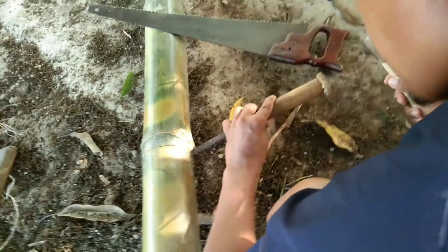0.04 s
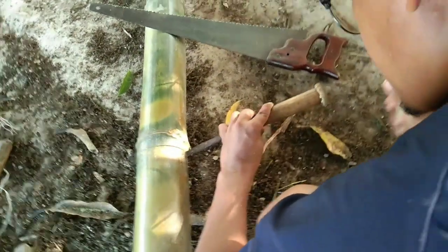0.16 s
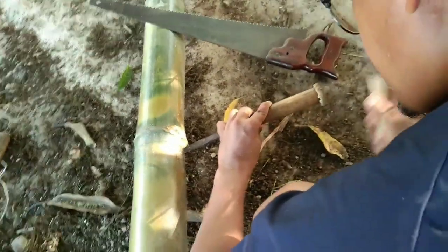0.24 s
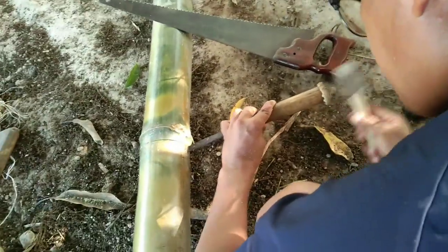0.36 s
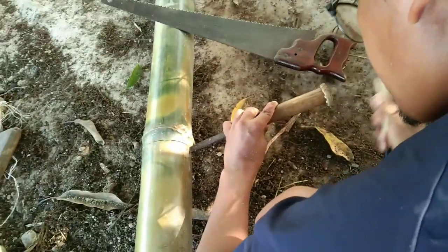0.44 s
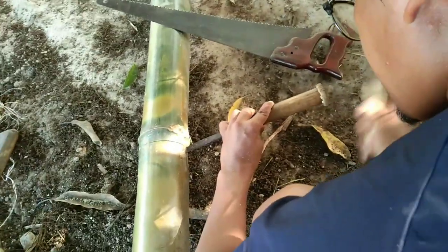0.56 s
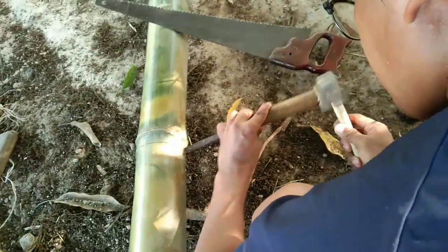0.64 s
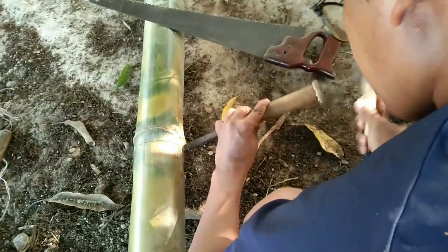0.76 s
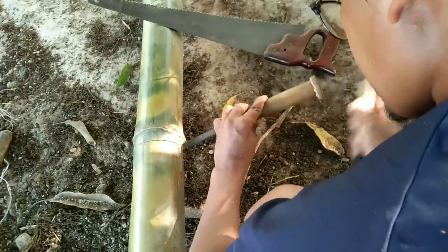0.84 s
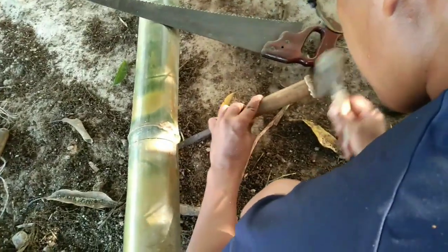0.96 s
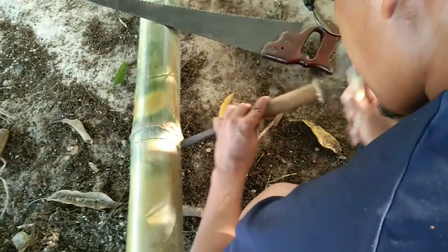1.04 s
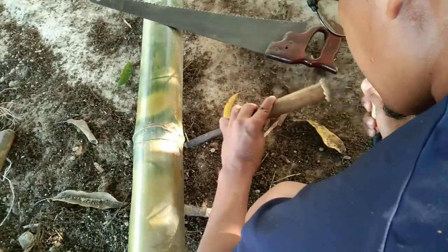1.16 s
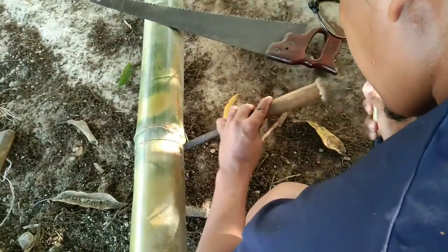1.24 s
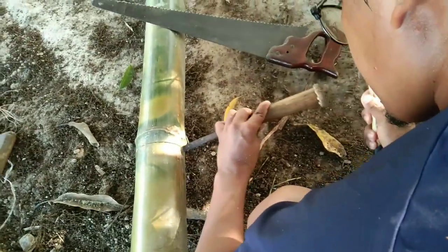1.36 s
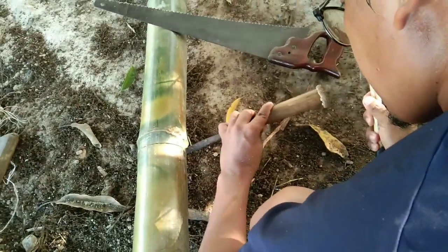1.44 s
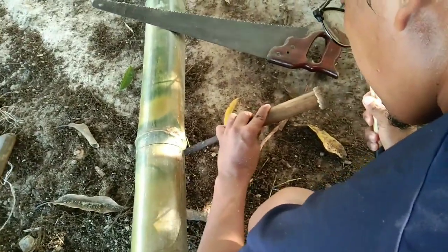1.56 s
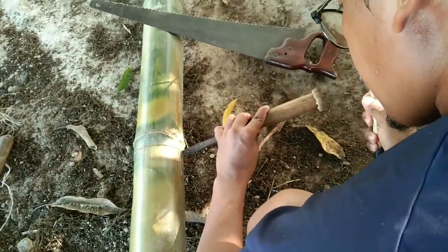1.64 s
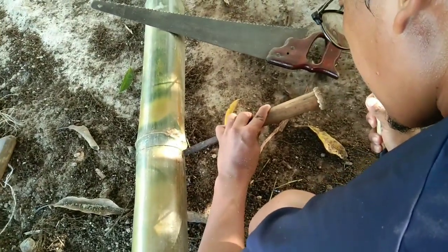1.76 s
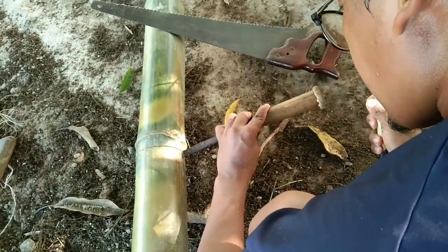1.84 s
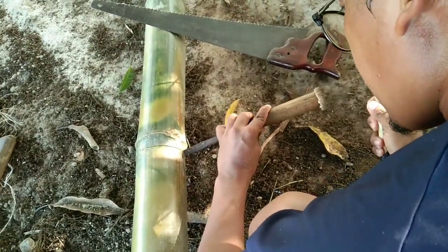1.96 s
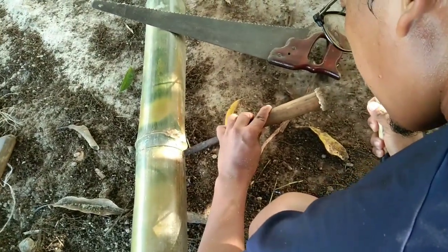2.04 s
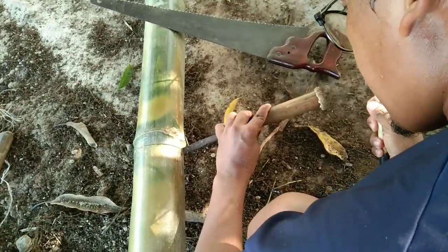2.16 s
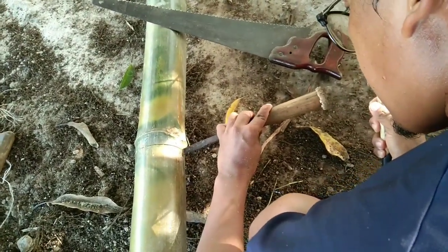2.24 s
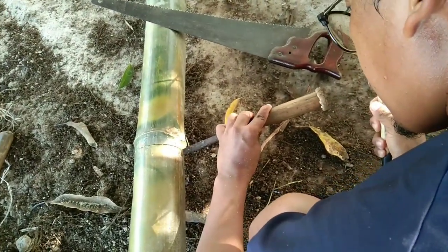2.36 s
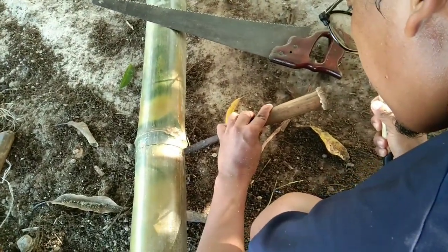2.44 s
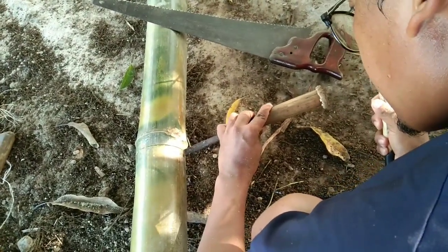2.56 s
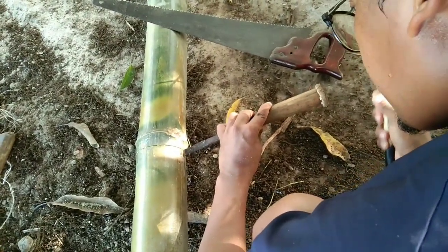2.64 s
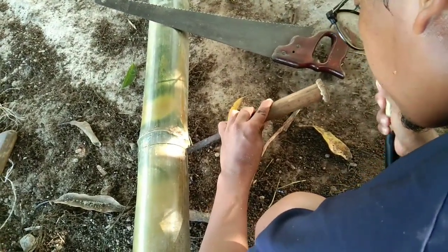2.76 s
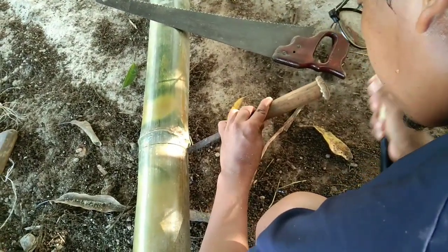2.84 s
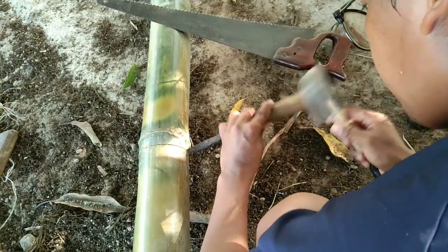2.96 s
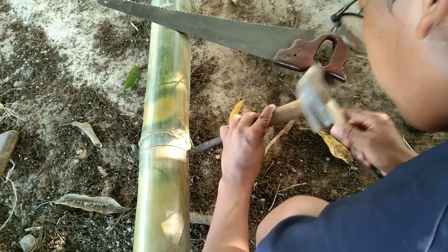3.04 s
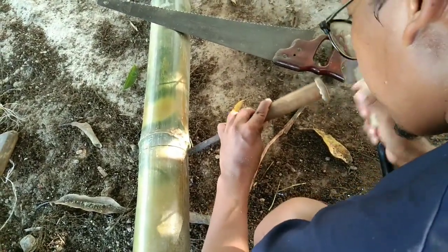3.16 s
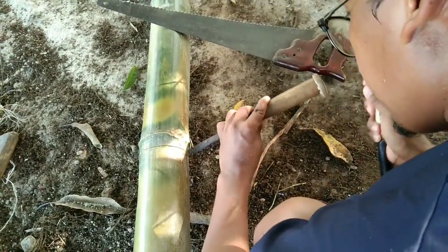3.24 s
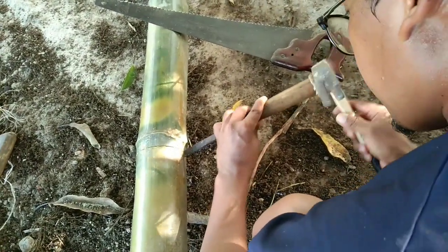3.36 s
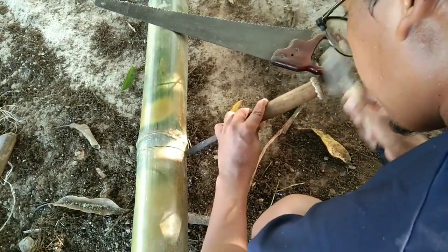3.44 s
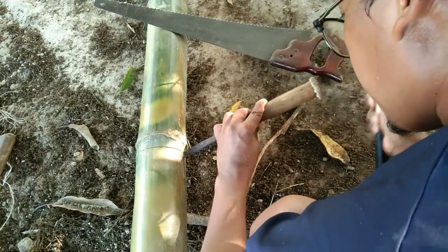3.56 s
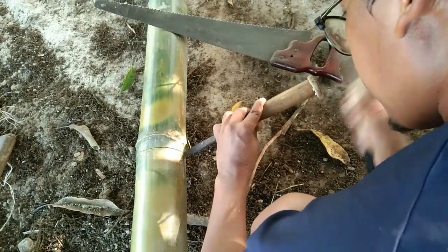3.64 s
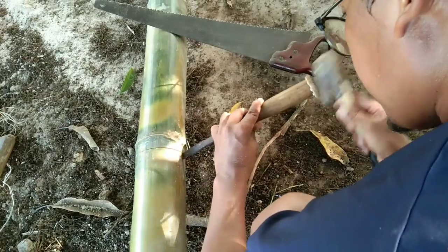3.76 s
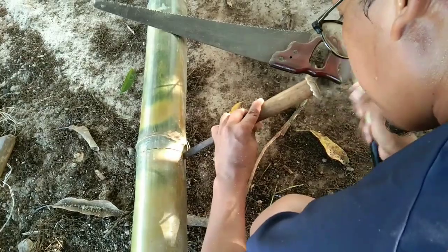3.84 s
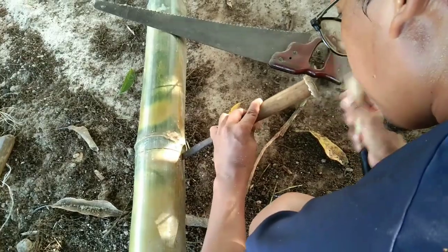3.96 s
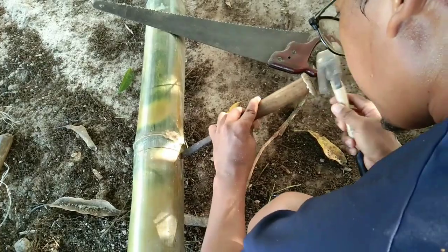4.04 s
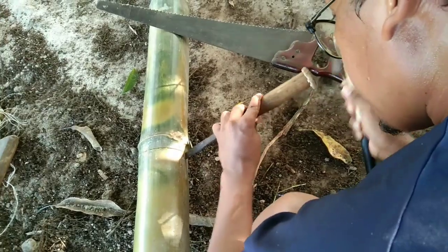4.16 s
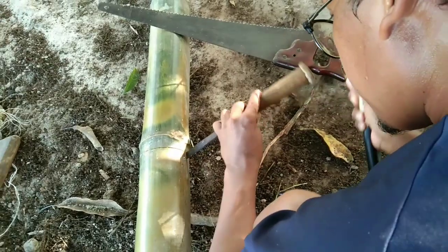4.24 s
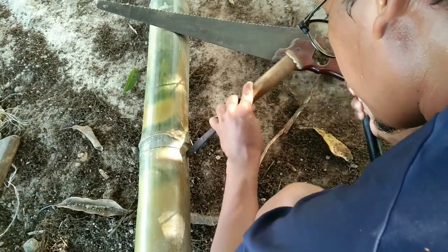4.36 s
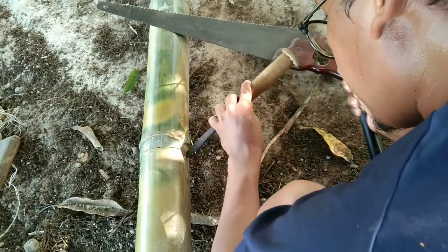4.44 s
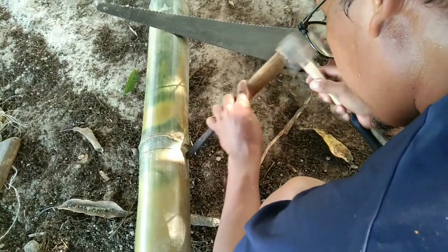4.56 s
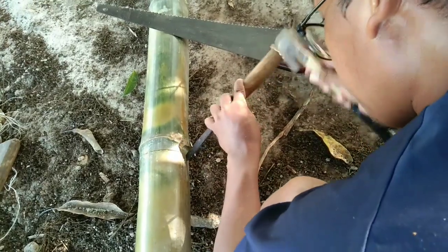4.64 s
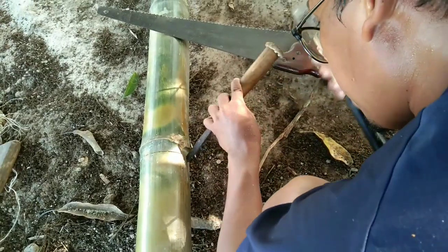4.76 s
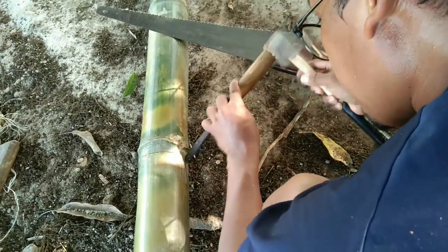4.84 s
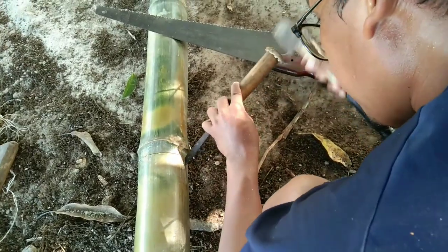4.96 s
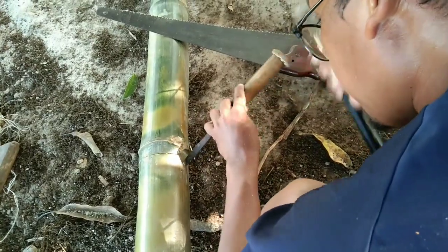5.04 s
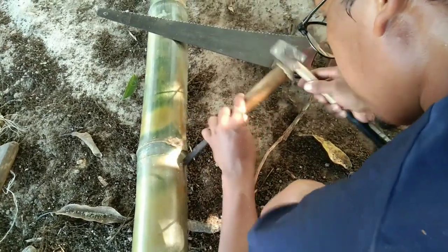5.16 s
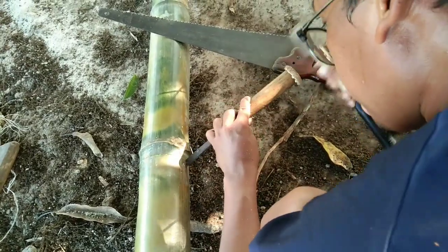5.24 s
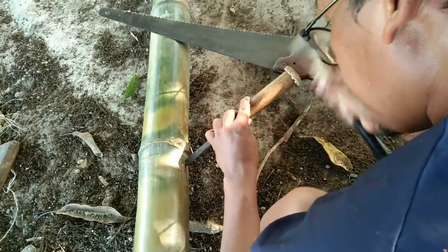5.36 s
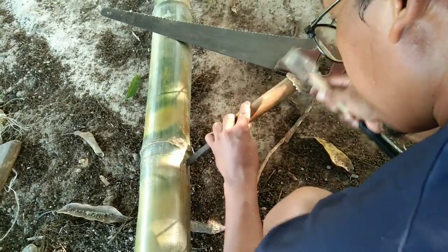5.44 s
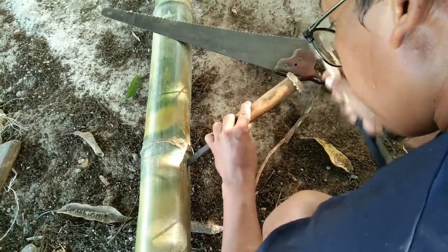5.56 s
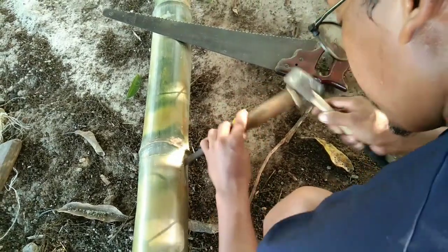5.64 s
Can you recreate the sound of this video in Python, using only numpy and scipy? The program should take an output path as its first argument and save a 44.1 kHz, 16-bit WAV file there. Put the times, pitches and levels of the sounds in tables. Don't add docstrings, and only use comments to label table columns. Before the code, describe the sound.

Outdoors on soil, very close to the microphone, a hammer hits a wood-handled chisel cutting green bamboo. Three sharp, hollow knocks come quickly, each with a steely edge and short rattle. Small ticks trail off into a lull of leaf rustle, cloth scuffs, a faint coo and rising bird slurs. Two more blows follow, a pause with falling chips, then five rapid cracks to the end, the loudest slightly overloaded.

```python
import sys
import numpy as np
from scipy import signal
from scipy.fft import rfft, irfft
from scipy.io import wavfile
from scipy.ndimage import uniform_filter1d

SR = 44100
rng = np.random.default_rng(int(sys.argv[2]) if len(sys.argv) > 2 else 0)


def field_ratio(decibels):
    return 10 ** (np.asarray(decibels, dtype=float) / 20)


def inscribe(sig):
    pcm = np.round(np.clip(np.atleast_2d(sig).T, -1, 1) * 32767)
    wavfile.write(sys.argv[1], SR, pcm.astype(np.int16))


N = 251370

# t/s, wood peak level/dB, handle and blade re wood level/dB, wood mode under the edge f/Hz
BLOWS = [
    (0.3444, -6, -8.5, 7, 766),
    (0.651, -3.5, 0, 4.5, 1459),
    (0.9335, -7.5, -4, -1.5, 854),
    (3.3934, -6.5, -0.5, 5, 640),
    (3.7107, 0, -8.5, -3, 1350),
    (4.5999, -9, -13, -11, 599),
    (4.867, -3.5, -10, 8, 863),
    (5.127, -4, -8, 8.5, 1077),
    (5.402, -3.5, -21.5, 4.5, 555),
    (5.639, -1, -8.5, 0.5, 1424),
]
# f/Hz, level/dB, t60/s
THUDS = [
    (204, -18, 0.0428),
    (190, -25, 0.0267),
    (199.5, -16, 0.032),
    (148.4, -20, 0.0175),
    (158.4, -24, 0.054),
    (165, -17, 0.041),
    (173.4, -18.5, 0.0463),
    (325, -12, 0.057),
    (289.5, -11, 0.082),
    (306, -17.5, 0.142),
]
# emphasis level/dB, handle f/Hz, blade f/Hz, split fibre level/dB
SPOTS = [
    (14.34, 3160, 5525, -44),
    (18.3, 3184, 7340, -51),
    (6.03, 2830, 4200, -46.5),
    (2, 3420, 5444, -27),
    (23.9, 3240, 6500, -21.5),
    (5, 2664, 6800, -53.5),
    (6, 2983, 6980, -41.5),
    (7.9, 2412, 6800, -41),
    (14.3, 2900, 5700, -45.5),
    (10.1, 2433, 4400, -28.5),
]
# level/dB, bass level/dB, handle range level/dB, blade range level/dB, t60/s
TAILS = [
    (-22, 1.5, -8.5, 4.5, 0.252),
    (-24.5, 1.5, 8.5, 9, 0.345),
    (-24.5, 4, 0, 2.5, 0.371),
    (-21.5, -13, 1.5, 4.5, 0.2665),
    (-19.5, -7, -4.5, 0, 0.2765),
    (-23.5, 4.5, -11.5, -10.5, 0.2155),
    (-24, 3, 6.5, 10, 0.244),
    (-24, 5.5, 2.5, 5.5, 0.295),
    (-18.5, 2, -4, -1.5, 0.2465),
    (-17, -17, 0.5, -3, 0.176),
]
# t/s, f/Hz, level/dB, t60/s
WALL_MODES = [(.345, 439, -28.5, 0.018), (.345, 1770, -20, 0.0285), (.652, 2163, -17, .02),
              (.652, 2715, -17.5, 0.015), (.653, 3184, -15, 0.048), (.934, 1450, -16.5, 0.019),
              (.935, 3944, -25.5, 0.0157), (.935, 5680, -11.5, 0.0116), (3.395, 826, -13, 0.0224),
              (3.394, 1691, -12, 0.041), (3.394, 2290, -18.5, 0.026), (3.41, 640, -14, 0.092),
              (3.712, 615, -18.5, 0.028), (3.711, 1050, -13.5, 0.021), (3.711, 2190, -14, 0.0158),
              (4.599, 1315, -29, 0.022), (4.601, 2760, -30.5, 0.02), (4.601, 3660, -41.5, 0.0156),
              (4.868, 699, -12, 0.0228), (4.868, 1522, -14.5, 0.0194), (4.868, 2030, -20, 0.0234),
              (4.869, 3540, -19, 0.0193), (4.88, 519, -28, 0.17), (5.127, 1353, -9, 0.02),
              (5.649, 1480, -21, 0.094), (.652, 1900, -17, .03), (3.394, 728, -17.5, 0.033),
              (3.712, 501, -20.5, 0.026), (3.711, 4735, -14, 0.014), (4.872, 1350, -18, .06),
              (5.129, 2297, -21.5, 0.034), (5.13, 1456, -22, 0.098), (5.135, 505, -26, 0.178),
              (5.13, 1700, -25.5, .07), (5.405, 1296, -22, 0.098), (5.405, 1431, -19, 0.067),
              (5.404, 432.3, -23.5, 0.081), (5.406, 2429, -29, 0.093), (5.405, 6136, -12, 0.037),
              (5.64, 1580, -17, .06), (5.641, 1277, -19, 0.108), (5.643, 2439, -20.5, 0.103),
              (5.64, 4780, -18.5, 0.079), (5.642, 499, -24, 0.185), (5.642, 433.3, -20.5, 0.124),
              (5.648, 759.8, -23.5, 0.148)]
# t/s, f/Hz, level/dB, t60/s
LOOSE_MODES = [(.4755, 894, -21, 0.03), (0.4787, 1754, -24, 0.0216), (.479, 2064, -28, 0.039),
               (0.4807, 2668, -24.5, 0.0226), (.513, 4000, -29, 0.0123), (.81, 898, -29, 0.0315),
               (.834, 805, -28, 0.0495), (.878, 544, -38, 0.056), (.914, 1003, -27.5, 0.052),
               (1.064, 1378, -37.5, 0.053), (1.111, 1385, -35, 0.049), (1.345, 403, -44, 0.077),
               (2.915, 376.4, -46, 0.071), (3.212, 935, -45, 0.039), (5.57, 540, -39, .12),
               (3.362, 696, -42.5, .04), (3.888, 1395, -37.5, 0.064), (3.89, 2550, -41.5, 0.052),
               (3.93, 1350, -39, 0.062), (3.932, 551, -41, 0.039), (3.97, 1142, -46.5, 0.116),
               (4.013, 2600, -42.5, .03), (4.045, 904, -46.5, .06), (4.76, 6200, -28, 0.0216),
               (5.266, 785, -37.5, 0.0214), (5.321, 6910, -20.5, 0.013)]
# t/s, level/dB, f/Hz
HOPS = [(0.386, -22, 754), (0.821, -30.5, 700), (.946, -17, 2200), (.963, -14, 830), (3.433, -17, 801),
        (3.465, -27, 957), (3.741, -27.5, 896), (3.782, -26, 980), (3.862, -27.5, 944), (4.621, -26.5, 991),
        (4.896, -39, 780), (4.928, -40, 1700), (5.66, -23, 740)]
# t/s, wood peak level/dB, handle re wood level/dB, wood f/Hz, rattle re wood level/dB
KNOCKS = [(0.476, -30, -19, 986, -13.5), (0.807, -20.5, -4, 513.3, -9.5), (0.834, -33, -40, 810, -6.5),
          (0.856, -25, -23.5, 520, -17), (0.912, -23, 1, 956, -14), (1.068, -33, -10.5, 431, -7),
          (1.115, -36, 6.5, 730, -2.5), (1.168, -46.5, 12.5, 680, 2), (1.284, -46, -11.5, 515, -1),
          (1.442, -31, -15.5, 573, -19), (2.705, -45.5, 12, 406, -12), (2.93, -51, -12, 774, 2),
          (2.998, -48, -9, 460, -5), (4.664, -28, -12.5, 487, -18), (5.282, -35, -11.5, 519.7, -15.5)]
# t/s, level/dB
RETURNS = [
    (.474, -30.5),
    (3.511, -32),
    (3.838, -31),
    (4.99, -39.5),
    (5.263, -39),
    (5.524, -31.5),
    (5.621, -41),
]
# t/s, peak level/dB, handle re peak level/dB, wood re peak level/dB
TICKS = [(0.2079, -22, -24, -31.5), (0.711, -20.5, 8, -10.5), (0.887, -37, 5.5, -7), (1, -23, 1.5, 3.5),
         (1.008, -20, 0.5, 4), (1.1098, -25, -2, 4), (1.166, -26, -2.5, 5), (1.3513, -32.5, 4, -2),
         (2.7298, -35, 10.5, -2.5), (2.8475, -39.5, 5.5, -12.5), (2.9978, -27, -21, -24),
         (3.209, -40.5, -20.5, -17.5), (3.357, -41, 14.5, 5), (3.573, -31, -32, -30),
         (3.591, -30.5, -24, -19.5), (3.772, -26, -5.5, -12), (3.89, -33.5, 3.5, 6.5),
         (3.93, -31, -1.5, -4), (5.0192, -26.5, -10, -22.5), (5.322, -22.5, 0.5, -7)]
# t/s, f/Hz, t60/s, level/dB
HUMS = [(0.36, 226, .18, -31), (.99, 200, .3, -42), (1.0, 716, .45, -38), (1.064, 1365, .12, -48),
        (1.08, 1130, .35, -45), (1.172, 716, .4, -43), (1.175, 510, .15, -45), (1.17, 1362, .14, -42),
        (1.17, 2449, .15, -47), (3.0, 195, .1, -46), (3.53, 540, .15, -42), (3.73, 511, .2, -36),
        (3.732, 1416, .15, -37), (3.851, 430, .2, -47), (3.9, 700, .5, -44), (5.135, 272, .3, -28),
        (5.42, 275, .3, -32), (5.425, 500, .3, -37)]
# t/s, level/dB
SNAPS = [(.157, -57), (.2084, -55), (.4354, -56), (0.9346, -34), (1.0061, -48), (1.1107, -58),
         (1.1616, -54), (1.5813, -51), (2.0712, -51.5), (2.9964, -46), (3.9305, -60.5), (4.2393, -56.5),
         (4.6001, -48), (5.018, -45), (5.219, -50.5), (5.3213, -39), (5.5727, -59), (5.6397, -23.5)]
# f/Hz, t60/s, level/dB
WOOD = [(548, 0.058, -20.5), (640, 0.01, -24), (765.7, 0.0303, 7.5), (991, 0.0281, 10.5),
        (1350, 0.071, 4.5), (1523.5, 0.0383, 15)]
HANDLE = [(2200, 0.109, 2.44), (2677, 0.0202, 19.4), (3200, 0.0087, 17.8), (3610, 0.00514, 24.8)]
BLADE = [(5360, 0.016, -21.5), (4917, 0.082, -5), (5700, 0.024, 4), (6348.5, 0.01325, 20),
         (6569, 0.0192, 11), (7228, 0.0089, 19.5), (7500, 0.0145, 1.5), (8500, .01, -57.5)]
# f/Hz, level/dB
RATTLE = [(47, -54.5), (80, -16.5), (271, -3), (369, -5.5), (615, 1), (958, -3), (1630, -8.5), (3320, -10),
          (4520, -15), (5900, -9.5), (7530, -12), (10000, -32.5), (16000, -28.5)]
# f/Hz, level/dB
DULL = [(200, -33.5), (500, 3.5), (1000, -9), (2000, -13.5), (5000, -50.5)]
# t/s, level/dB, end f/Hz
CHIPS = [
    (0.116, -40, 4075),
    (0.221, -36, 4160),
    (2.611, -42, 4150),
    (4.006, -42, 2945),
    (4.208, -42, 3296),
    (4.303, -35, 3012),
    (4.40, -31.5, 3200),
    (4.541, -33.5, 3526),
    (4.634, -32, 3200),
    (4.758, -32.5, 3620),
]
# t/s, length/s, start f/Hz, end f/Hz, level/dB
SLURS = [
    (0.451, 0.151, 5350, 7422, -39.5),
    (2.905, 0.133, 3840, 3960, -54),
    (3.051, 0.1636, 4710, 7238, -42),
    (3.245, 0.0263, 5700, 5910, -42),
    (3.282, 0.1204, 5800, 7207, -40.5),
    (3.436, 0.059, 2800, 3777, -43.5),
    (4.744, 0.032, 4900, 5663, -40.5),
    (4.769, 0.0585, 5940, 6180, -36.5),
    (4.812, 0.084, 6200, 7740, -44),
]
# t/s, f/Hz, level/dB
COO = [
    (2.812, 529, -61),
    (2.826, 547.6, -45),
    (2.858, 651.4, -41.5),
    (2.89, 605, -46),
    (2.908, 669, -45),
    (2.932, 750, -50),
    (2.955, 771, -61.5),
]
# t/s, length/s, centre f/Hz, width f/Hz, level/dB
SCUFFS = [(0.497, 0.026, 3620, 1300, -40.5), (0.534, 0.185, 6430, 2500, -42),
          (0.558, 0.085, 6880, 2800, -45), (0.592, 0.06, 4360, 1700, -39.5),
          (0.885, 0.0066, 3750, 1600, -38), (1.623, 0.059, 4950, 4500, -44),
          (1.711, 0.028, 4480, 4400, -45.5), (1.748, 0.0246, 4470, 4400, -44),
          (2.72, 0.0246, 2286, 380, -54), (2.725, 0.0075, 4650, 380, -45),
          (2.847, 0.0057, 4180, 1000, -44.5), (2.87, 0.172, 3580, 950, -53.5),
          (2.916, 0.0227, 880, 620, -52), (3.098, 0.107, 6400, 1800, -50),
          (3.357, 0.0124, 3090, 1600, -39.5), (4.215, 0.071, 3715, 380, -54.5),
          (4.41, 0.0446, 6410, 2600, -41), (4.415, 0.0334, 3550, 1600, -42.5),
          (4.47, 0.0119, 3100, 1900, -39), (4.765, .023, 3720, 520, -53), (5.47, 0.0334, 3430, 1050, -42)]
# t/s, level/dB
RUSTLE = [(0.0, -55.5), (0.44, -54), (0.57, -47), (0.81, -58), (1.16, -53), (1.4, -61), (1.63, -54.5),
          (2.24, -57.5), (2.57, -56.5), (3.08, -54.5), (3.35, -52), (3.49, -57), (3.83, -55.5), (4.2, -60),
          (4.48, -50.5), (4.76, -54), (5.16, -56), (5.7, -56.5)]
# f/Hz, level/dB
LEAVES = [(530, -53), (900, -17), (2000, -13.5), (2450, -3.5), (2700, -4), (4050, -3.5), (4510, -6.5),
          (6930, -3.5), (7710, -2.5), (8800, -22.5), (11600, -34.5), (15450, -35.5)]
# f/Hz, level/dB
AIR = [(20, -40), (35, -10), (80, 5.5), (145, -5.5), (360, -12.5), (610, -11), (1420, -18), (2100, -16.5),
       (3000, -16), (4500, -25), (6800, -20.5), (7500, -14.5), (8600, -30), (11200, -30), (11800, -52.5),
       (15400, -37.5), (15550, -62)]


def hammer():
    blow_body, blow_fibres = blows()
    tick_body, tick_fibres = ticks()
    body = blow_body + hops() + wall_modes() + knocks() + returns() + tick_body + hums()
    fibres = blow_fibres + tick_fibres + snaps()
    last = at(BLOWS[-1][0] - .01)
    body[last:] = band(body[last:], 275, 15300)
    main_body = band(body, 95.8, 6985)
    splitting = band(fibres, 3500, 13040, order=4)
    sheen = band(fibres + field_ratio(-31.5) * body, 13930, 14160, order=3)
    return main_body + splitting + field_ratio(8.5) * sheen


def blows():
    body, fibres = np.zeros(N), np.zeros(N)
    burst = fall(0.0099, 4000) + 0.063 * fall(0.108, 4000)
    for blow, thud, spot, tail in zip(BLOWS, THUDS, SPOTS, TAILS):
        s, db, handle_db, blade_db, wood_hz = blow
        thud_hz, thud_db, thud_t60 = thud
        spot_db, handle_hz, blade_hz, split_db = spot
        tail_db, bass_db, mid_db, top_db, tail_t60 = tail
        hit = strike(db, db + handle_db, db + blade_db, spot_db=spot_db, spot_hz=(wood_hz, handle_hz, blade_hz))
        add(body, s + 0.00038, hit)
        push = contact(0.001195, 0.0048, 0.065)
        add(body, s, field_ratio(thud_db) * ring(push, [(thud_hz, thud_t60, 0)], detune=0))
        add(body, s + 0.0010044, field_ratio(tail_db) * rattle(tail_t60, RATTLE, bass_db, mid_db, top_db))
        add(fibres, s + 0.001, field_ratio(split_db) * rng.standard_normal(4000) * burst)
    return body, fibres


def strike(wood_db, handle_db, blade_db, shift=0.989, spot_db=0., spot_hz=()):
    wood_modes, handle_modes, blade_modes = list(WOOD), list(HANDLE), list(BLADE)
    if spot_hz:
        wood_modes.append((spot_hz[0], 0.01606, spot_db + 7.76))
        handle_modes.append((spot_hz[1], 0.0198, spot_db + 15.75))
        blade_modes.append((spot_hz[2], 0.0081, spot_db + 1.64))
    shove = .25 * contact(.0006, .0012, .2) - contact(.0004, .0012, .12, delay_s=.0007)
    wood = ring(shove, wood_modes, shift)
    handle = ring(contact(.0001, 0.001818, 0.373, delay_s=0.001324), handle_modes)
    blade = ring(contact(.00006, 0.001534, 0.251, delay_s=0.0016), blade_modes)
    bite_s, ease_s, grip_db = 0.00338, .0007, -2
    grip = np.clip((np.arange(len(blade)) / SR - bite_s) / ease_s, 0, 1)
    return field_ratio(wood_db) * wood + field_ratio(handle_db) * handle + field_ratio(blade_db + grip_db * grip) * blade


def contact(push_s, chatter_s, chatter, delay_s=0.):
    t = np.maximum(np.arange(12000) / SR - delay_s, 0)
    push = np.where(t < push_s, np.sin(np.pi * t / push_s), 0)
    swell = t / chatter_s * np.exp(1 - t / chatter_s)
    return chatter * rng.standard_normal(len(t)) * swell - push


def ring(force, modes, shift=0.9808, spread_db=2.0, detune=0.0267):
    t = np.arange(len(force)) / SR
    body = np.zeros(len(t))
    for hz, t60, db in modes:
        gain_luck, pitch_luck = rng.standard_normal(2)
        pitch = hz * shift * (1 + detune * pitch_luck)
        body += field_ratio(db + spread_db * gain_luck) * fall(t60, len(t)) * np.sin(2 * np.pi * pitch * t)
    y = signal.fftconvolve(force, body)[:len(t)]
    return y / np.abs(y).max()


def rattle(t60, points, bass_db=0., mid_db=0., top_db=0., rise_s=0.00091):
    count = 16000
    noise = colour(rng.standard_normal(count), points)
    bass, low, mid = (low_pass(noise, 2, hz) for hz in (400, 1500, 4300))
    rise = 1 - np.exp(-np.arange(count) / SR / rise_s)
    lows = (low + (field_ratio(bass_db) - 1) * bass) * field_ratio(2.5 * walk(150, count))
    lows = lows * fall(1.0, count)
    highs = field_ratio(mid_db) * (mid - low) + field_ratio(top_db) * (noise - mid)
    highs = highs * field_ratio(0.94 * walk(300, count))
    return rise * fall(t60, count) * (lows + highs)


def hops():
    out = np.zeros(N)
    first_hops = [(blow[0] + .0205, blow[1] - 13.5, 894) for blow in BLOWS]
    for s, db, hz in first_hops + list(HOPS):
        modes = [(hz, .03, 0), (0.633 * hz, .04, -4), (1.062 * hz, .025, -5)]
        add(out, s, field_ratio(db) * ring(contact(0.000154, 0.00549, 0.1755), modes, detune=0.0073))
    return out


def wall_modes():
    out = np.zeros(N)
    for s, hz, db, t60 in list(WALL_MODES) + list(LOOSE_MODES):
        push = contact(.0001, 0.000915, 0.248)
        add(out, s, field_ratio(db) * ring(push, [(hz, t60, 0)], shift=0.9997, detune=0))
    return out


def knocks():
    out = np.zeros(N)
    for s, db, handle_db, hz, tail_db in KNOCKS:
        hit = strike(db, db + handle_db - 2.0, -56, shift=hz / 800, spot_db=5., spot_hz=(800, 2650, 6260))
        add(out, s, hit)
        add(out, s, field_ratio(db + tail_db) * rattle(0.133, DULL))
    return out


def returns():
    out = np.zeros(N)
    low_hz, high_hz = 361, 949.4
    for s, db in RETURNS:
        curve = [(0, low_hz, db - 8.5), (.003, (low_hz + high_hz) / 2, db), (.006, high_hz, db),
                 (.012, high_hz, db - 6.5), (.02, high_hz, db - 27)]
        add(out, s, whistle(curve, 0.0143, 322))
        add(out, s + 0.003025, field_ratio(db - 4.5) * rattle(0.225, DULL))
    return out


def ticks():
    body, fibres = np.zeros(N), np.zeros(N)
    for s, db, handle_db, wood_db in TICKS:
        add(body, s - .0016, strike(db + wood_db - 9.5, db + handle_db - 7.0, db))
        add(fibres, s, field_ratio(db - 42) * rng.standard_normal(1000) * fall(.025, 1000))
    return body, fibres


def hums():
    out = np.zeros(N)
    for s, hz, t60, db in HUMS:
        modes = [(hz, t60, 0), (1.04 * hz, t60 / 2, -10)]
        hum = ring(contact(.00013, .005, .25), modes, shift=1, detune=0)
        add(out, s, field_ratio(db + 3 * walk(45, 12000)) * hum)
    return out


def snaps():
    out = np.zeros(N)
    for s, db in SNAPS:
        add(out, s, field_ratio(db) * rng.standard_normal(1000) * fall(0.0082, 1000))
    return out


def birds():
    calls = np.zeros(N)
    for s, db, end_hz in CHIPS:
        add(calls, s, whistle(chip(db, end_hz), .04, 1500))
    for s, *call in SLURS:
        add(calls, s, whistle(slur(*call), .045, 500))
    count = at(.6)
    trees = rng.standard_normal(count) * (fall(0.44, count) + 1.75 * fall(0.021, count))
    scatter = signal.fftconvolve(calls, trees / np.linalg.norm(trees))[:N]
    out = field_ratio(-12) * calls + scatter
    start = COO[0][0]
    broken = field_ratio(-5 + 3 * walk(60, at(COO[-1][0] - start)))
    add(out, start, broken * whistle(COO, 0.03, 300))
    return out


def chip(db, end_hz):
    top_hz, fall_hz_per_s = 6275, 120000
    length = (top_hz - end_hz) / fall_hz_per_s
    knee_hz = end_hz + .3 * (top_hz - end_hz)
    return [(0, .9 * top_hz, db - 4), (.002, top_hz, db), (.005, .92 * top_hz, db - 1),
            (.5 * length, knee_hz, db - 5), (length, end_hz, db - 8)]


def slur(length, start_hz, end_hz, db):
    climb_s = 0.73 * length
    attack_s, release_s = min(0.037, length / 3), max(length - 0.0175, length / 2)
    s = np.sort([0, attack_s, climb_s, release_s, length])
    pitch = np.interp(s, [0, climb_s], [start_hz, end_hz])
    return np.transpose([s, pitch, db + np.array([-3, 3, 0, -3.5, -3])])


def whistle(curve, flutter, flutter_rate):
    s, hz, db = np.transpose(curve)
    t = s[0] + np.arange(at(s[-1] - s[0])) / SR
    pitch = np.interp(t, s, hz) * (1 + flutter * walk(flutter_rate, len(t)))
    return np.sqrt(2) * field_ratio(np.interp(t, s, db)) * np.sin(2 * np.pi * np.cumsum(pitch) / SR)


def scuffs():
    out = np.zeros(N)
    for s, length, hz, width, db in SCUFFS:
        t = np.arange(at(length + 0.051)) / SR
        shape = np.minimum(t / 0.0016, 1) * np.exp(-np.maximum(t - length, 0) / 0.0136)
        grain = rng.standard_normal(len(t)) * field_ratio(2 * walk(162, len(t)))
        brush = band(grain, hz - width / 2, hz + width / 2, order=3)
        add(out, s, field_ratio(db) * shape * brush / brush.std())
    return out


def rustle():
    db = np.interp(np.arange(N) / SR, *np.transpose(RUSTLE)) + 6.95
    scrapes = colour(rng.standard_normal(N) * field_ratio(1.33 * walk(90, N)), LEAVES)
    body = low_pass(scrapes, 4, 8500)
    top_db = -39.5 + 0.1355 * db
    return field_ratio(db) * body + field_ratio(top_db) * (scrapes - body)


def air():
    hiss = colour(rng.standard_normal(N), AIR) * field_ratio(-49.5 + 0.07 * walk(3.64, N))
    drone = band(rng.standard_normal(N), 45.1, 102.5)
    return hiss + drone / drone.std() * field_ratio(-54 + 0.5 * walk(42, N))


def at(s):
    return int(round(s * SR))


def add(out, s, x):
    x = x[:N - at(s)]
    out[at(s):at(s) + len(x)] += x


def fall(t60, count):
    return np.exp(-np.log(1000) * np.arange(count) / SR / t60)


def walk(rate, count):
    k = int(SR / rate)
    steps = np.repeat(rng.standard_normal(count // k + 1), k)
    return uniform_filter1d(uniform_filter1d(steps, k), k)[:count] * 1.3


def colour(x, points):
    hz, db = np.transpose(points)
    f = np.maximum(np.arange(len(x) // 2 + 1) * SR / len(x), 1)
    gain = field_ratio(np.interp(np.log(f), np.log(hz), db, left=-90, right=-90))
    y = irfft(rfft(x) * gain, len(x))
    return y / y.std()


def band(x, lo_hz, hi_hz, order=2):
    return signal.sosfilt(signal.butter(order, [lo_hz, hi_hz], "bandpass", fs=SR, output="sos"), x)


def low_pass(x, order, hz):
    return signal.sosfiltfilt(signal.butter(order, hz, fs=SR, output="sos"), x)


def scene():
    return (hammer() + birds() + scuffs() + rustle() + air())[None]


def top_cut(x):
    return signal.sosfilt(signal.butter(12, 16630, fs=SR, output="sos"), x)


def record(dry):
    thin = signal.sosfilt(signal.butter(2, 60, "highpass", fs=SR, output="sos"), dry)
    soft = thin / (1 + np.abs(thin) ** 8) ** (1 / 8)
    cut = signal.sosfiltfilt(signal.ellip(6, .1, 30, 15650, fs=SR, output="sos"), soft)
    return top_cut(cut)


dry = scene()
out = record(dry)
inscribe(out)
```